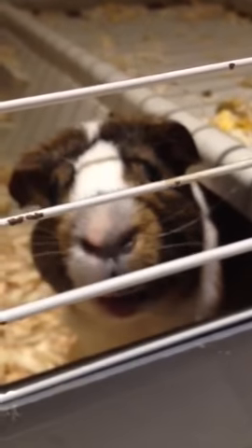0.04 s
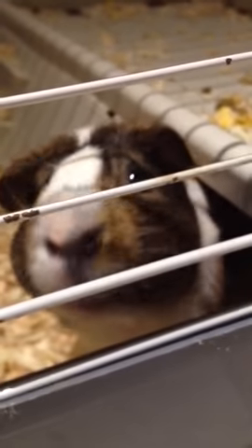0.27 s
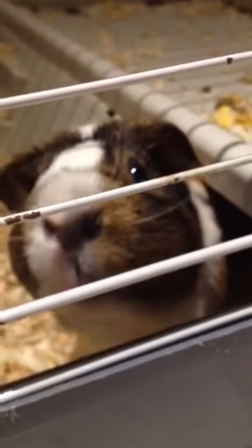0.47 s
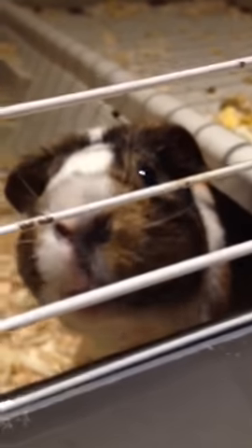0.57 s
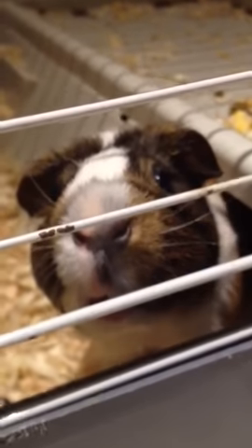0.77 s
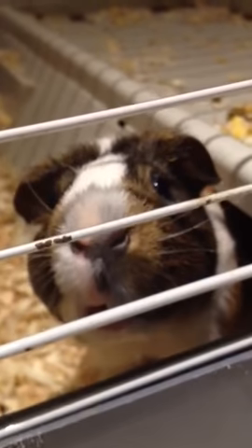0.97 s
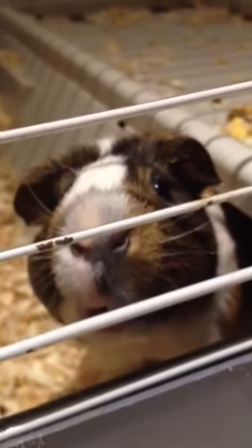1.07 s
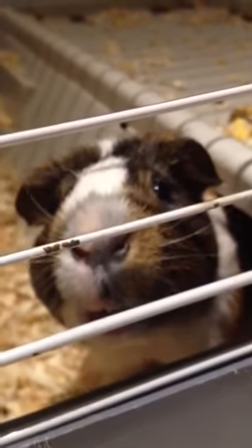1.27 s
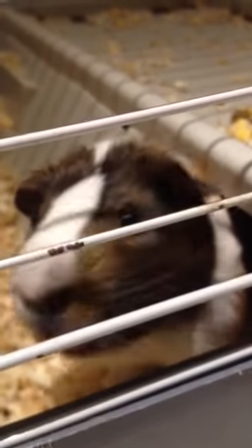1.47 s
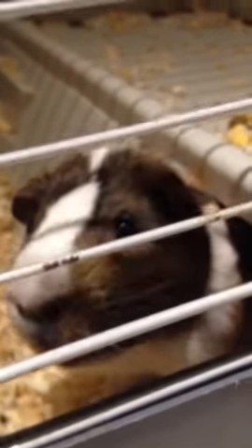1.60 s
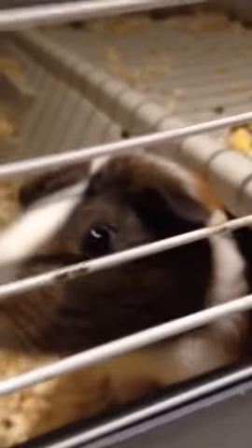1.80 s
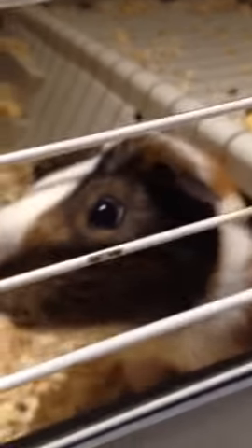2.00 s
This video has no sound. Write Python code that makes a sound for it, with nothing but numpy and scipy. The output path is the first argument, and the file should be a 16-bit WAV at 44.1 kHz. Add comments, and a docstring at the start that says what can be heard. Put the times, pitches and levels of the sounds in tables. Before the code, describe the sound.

A guinea pig close to the microphone gives two short, bright chirps that fall in pitch. It then shifts in its cage, softly rustling wood shavings and bumping the plastic tray, in a small, quiet room.

```python
"""A guinea pig close by gives two short, falling chirps: nearly pure whistles with harmonics and a rasp.
As it shifts about its cage, wood shavings rustle in tiny snaps and friction, the wires resonate with
them, and its paws bump the plastic tray and excite its modes. The small room reverberates briefly;
behind it all lie a faint hiss and a motor hum in which two close tones beat."""
import sys
import numpy as np
from scipy import signal
from scipy.fft import rfft, irfft, next_fast_len
from scipy.io import wavfile

SR = 44100
rng = np.random.default_rng(int(sys.argv[2]) if len(sys.argv) > 2 else 0)


def persist_wave(psi):
    """Save psi, clipped to +-1, as 16-bit WAV."""
    counts = np.round(np.clip(psi, -1, 1) * 32767).astype(np.int16)
    wavfile.write(sys.argv[1], SR, np.atleast_2d(counts).T)


N = 90404
T = np.arange(N) / SR


def from_db(db):
    """Amplitude ratio of a level: a factor of ten per 20 dB."""
    return 10 ** (np.asarray(db) / 20)


def unit_rms(x):
    """Normalisation to unit mean power."""
    return x / np.sqrt(np.mean(x ** 2) + 1e-20)


def drift(corner_hz):
    """Smooth random fluctuation: white noise through a two-pole low-pass, at unit power."""
    pole = np.exp(-2 * np.pi * corner_hz / SR)
    return unit_rms(signal.lfilter([1], [1, -2 * pole, pole * pole], rng.standard_normal(N + SR))[SR:])


def coloured(x, spectrum, tilt_db=0):
    """Spectral shaping by (f/Hz, level/dB) points and a tilt per octave, at unit power."""
    size = next_fast_len(N + SR)
    octave = np.log2(np.fft.rfftfreq(size, 1 / SR) + 1)
    hz, db = np.transpose(spectrum)
    gain_db = np.interp(octave, np.log2(hz), db + tilt_db * np.log2(hz / hz[0]))
    octaves_outside = np.maximum(np.log2(hz[0]) - octave, 0) + np.maximum(octave - np.log2(hz[-1]), 0)
    return unit_rms(irfft(rfft(x, size) * from_db(gain_db - 12 * octaves_outside), size)[:N])


def envelope(start, rise, hold, fade, db):
    """Linear rise, hold at db, then exponential decay of 20 dB per fade; times in seconds."""
    fading_s = np.maximum(T - start - rise - hold, 0)
    return np.clip((T - start) / rise, 0, 1) * from_db(db - 20 * fading_s / fade)


def motor_hum(beat_peak_s=1.32):
    """Beating: two of the tones interfere at their difference frequency, about 10 Hz."""
    # tones of the motor: f/Hz, level/dB
    tones = [(100, -81.5), (200.5, -67.5), (210.6, -62), (1131.5, -75)]
    cycles = rng.random()
    return sum(np.sqrt(2) * from_db(db) * np.sin(2 * np.pi * (hz * (T - beat_peak_s) + cycles))
               for hz, db in tones)


def room_hiss(level_db=-64, waver_db=1):
    """Broadband noise under a slight, slow amplitude modulation."""
    # spectrum of the hiss: f/Hz, relative level/dB
    hiss_spectrum = [(25, -30), (45, -28), (65, -15.5), (90, -7.5), (170, 1.5), (300, 0.5), (600, -6),
                     (1200, -6.5), (2200, -11), (4500, -12.5), (7000, -14), (10000, -22), (15000, -19)]
    return from_db(level_db + waver_db * drift(3.7)) * coloured(rng.standard_normal(N), hiss_spectrum)


def crackle(snaps_per_s=4000, spread_db=3.5, friction_share=0.538):
    """Shot noise of tiny, uneven snaps over smooth friction; being incoherent, their powers add."""
    sizes = from_db(spread_db * np.minimum(rng.exponential(1, N), 4)) * rng.choice([-1, 1], N)
    snaps = unit_rms(sizes * (rng.random(N) < snaps_per_s / SR))
    return np.sqrt(1 - friction_share) * snaps + np.sqrt(friction_share) * rng.standard_normal(N)


def shavings_rustle():
    """Fracture and friction: each movement crushes a patch of shavings in a burst of noise."""
    # movements: t/s, rise/s, hold/s, 20 dB fade/s, level/dB, tilt/(dB per octave)
    movements = [ (0.125, 0.0106, 0.0183, 2.2, -73.5, -1.5), (0.223, 0.00304, .01, 0.1371, -58.5, 0),
                 (.31, 0.0603, .12, 0.2767, -58.5, -1.91), (0.548, 0.0105, 0.014, 0.57, -65.5, -3),
                 (0.718, 0.0225, 0.0363, 0.3743, -60.5, -1.5), (0.879, 0.0074, 0.019, 0.2143, -63.5, 6),
                 (0.925, 0.00155, 0.0326, 0.153, -57.5, -2), (1.053, 0.0062, 0.019, 0.0826, -52, 1.06),
                 (1.081, 0.0115, 0.0176, 0.1258, -47, 0.65), (1.185, 0.0308, 0.0654, 0.0365, -61.5, -1.13),
                 (1.371, 0.0052, 0.0534, 0.0046, -63, 1.5), (1.667, 0.0184, 0.0146, 0.4, -67.5, 1.1),
                 (1.813, 0.0407, 0.038, 0.21, -64.5, -0.4)]
    # spectrum of the shavings: f/Hz, relative level/dB
    wood_spectrum = [(200, -3.5), (600, 1), (1200, -2.5), (2200, 0), (3200, -1), (4400, 1.5), (5600, -3.5),
                     (6400, -1.5), (9000, -2), (12500, -11.5), (15500, -16.5)]
    return sum(envelope(*shape) * coloured(crackle(), wood_spectrum, tilt) for *shape, tilt in movements)


def cage_wires(rustle, bandwidth_hz=44.8):
    """Sympathetic resonance: the rustle drives the wires in narrow bands about their modes."""
    # modes of the wires: f/Hz, peak gain/dB
    wire_modes = [(1480, 1.5), (2055, -3), (3290, 0.5), (3420, -5), (4330, 0.5), (5080, 4.5), (6250, 4.5),
                  (7000, 1.5), (11550, 2)]
    return sum(from_db(db) * signal.lfilter(*signal.iirpeak(hz, hz / bandwidth_hz, fs=SR), rustle)
               for hz, db in wire_modes)


def reverberation(x, low_t60_s=0.607, treble_t60_s=0.18, split_hz=8200, build_s=0.004):
    """The room's diffuse field decays exponentially in two bands; the fainter treble dies sooner."""
    # colour and level of the room's reverberant tail: f/Hz, level/dB
    tail_spectrum = [(200, -20), (900, -15), (1700, -15.5), (2050, -16), (2400, -20), (3300, -15),
                     (4200, -16.5), (4750, -12.5), (6000, -13), (9000, -19.5), (15000, -32.5)]
    hz, db = np.transpose(tail_spectrum)
    gain = from_db(np.interp(np.log(np.fft.rfftfreq(N, 1 / SR) + 1), np.log(hz), db))
    response = 0
    for side, t60 in (("low", low_t60_s), ("high", treble_t60_s)):
        noise = irfft(rfft(rng.standard_normal(N)) * gain, N)
        noise = signal.sosfilt(signal.butter(4, split_hz, side, fs=SR, output="sos"), noise)
        decay = from_db(-60 * T / t60) * (1 - np.exp(-T / build_s))
        response = response + noise * decay / np.linalg.norm(decay)
    return signal.fftconvolve(x, response)[:N]


def chirps(waver_hz=212, shimmer_db=0.5, rasp_follow=0.31, edge_s=0.0033):
    """A harmonic series on a falling pitch; overtones flare early, and noise pulses once per period."""
    # contour of each chirp: t/s, f/Hz, level/dB of harmonics 1, 2, 3 and 4
    contours = [
        [(.237, 2526, -58, -78, -81, -85), (.2415, 2412, -35, -61, -52.5, -78),
         (.2445, 2360, -26.5, -30, -51.5, -57), (.2495, 2215, -22, -33, -47, -53.5),
         (.2545, 2072, -25.5, -50, -51.5, -61), (.267, 2048, -27.5, -57, -55.5, -64.5),
         (.281, 1944, -34.5, -59.5, -58, -78), (.290, 1771, -36, -66, -69.5, -87),
         (.293, 1610, -50.5, -68, -86, -89)],
        [(.437, 2680, -45, -70.5, -64, -85), (.441, 2557, -34, -46, -57, -77.5),
         (.4465, 2359, -24.5, -36.5, -44, -69), (.4510, 2184, -21.5, -32, -41.5, -70.5),
         (.4545, 1952, -31.5, -41, -54.5, -51.5), (.461, 1766, -30.5, -42, -59.5, -56.5),
         (.478, 1621, -38, -41, -70, -62.5), (.487, 1504, -39, -51.5, -74.5, -73.5),
         (.491, 1304, -52, -66.5, -76.5, -79)],
    ]
    # voice of each chirp: fall per harmonic above the fourth/dB, relative pitch jitter, rasp level/dB
    voices = [(8, 0.00307, -69.5), (15, 0.0067, -45.5)]
    # spectrum of the rasp: f/Hz, relative level/dB
    rasp_spectrum = [(1200, -8.5), (2800, -2.5), (3600, -0.5), (4700, 5), (5700, -2.5), (7200, -6.5),
                     (8300, -6), (9500, -25), (12500, -12), (15000, -23)]
    out = 0
    for contour, (fall_db, jitter, rasp_db) in zip(contours, voices):
        times, *columns = np.transpose(contour)
        hz, *levels = [np.interp(T, times, column) for column in columns]
        levels += [levels[-1] - fall_db * step for step in (1, 2, 3)]  # harmonics 5 to 7
        phase = 2 * np.pi * np.cumsum(hz * (1 + jitter * drift(waver_hz))) / SR
        whistle = np.sqrt(2) * sum(from_db(db) * np.sin(k * phase) for k, db in enumerate(levels, 1))
        rasp = coloured(rng.standard_normal(N) * (1 + np.cos(phase)), rasp_spectrum)
        rasp *= from_db(rasp_db + rasp_follow * (levels[0] - levels[0].max()))
        gate = np.clip(np.minimum(T - times[0], times[-1] - T) / edge_s + 1, 0, 1)
        out += gate * (whistle + rasp) * from_db(shimmer_db * drift(waver_hz))
    return out


def tray_bumps():
    """Forced vibration: paws and body scuff the plastic floor, which colours the noise dull."""
    # contacts: t/s, rise/s, hold/s, 20 dB fade/s, level/dB, tilt/(dB per octave)
    contacts = [ (0.299, 0.041, .14, 0.81, -74, 4.5), (0.545, 0.0058, 0.035, 0.84, -59.5, 2.5),
                (0.732, 0.0173, 0.0354, 0.42, -61.5, 2), (0.88, 0.011, 0.0196, 0.0157, -59.5, -2),
                (.930, 0.0022, 0.012, 0.25, -57, 2.5), (1.082, 0.007, .03, 0.4942, -60, 0.5),
                (1.435, 0.044, 0.011, 0.09, -65.5, 2), (1.725, 0.0214, .01, 0.85, -67, -0.5),
                (1.82, .09, .035, .05, -63.5, 2.5), ]
    # spectrum of the tray: f/Hz, relative level/dB
    tray_spectrum = [(120, -22.5), (220, 0), (300, -4), (450, -3), (720, -0.5), (1100, -7), (1800, -13),
                     (4000, -20)]
    return sum(envelope(*shape) * coloured(crackle(), tray_spectrum, tilt) for *shape, tilt in contacts)


def paw_knocks(low_cut_hz=261):
    """Free vibration: a paw lands and the tray's damped modes give a short, hollow ring."""
    # impacts: t/s, level/dB
    impacts = [(.9315, -44), (.9425, -53)]
    # modes of the tray: f/Hz, relative level/dB, T60/s
    tray_modes = [(302.4, -6, 0.059), (397.5, -2, 0.0546), (526.6, -5, 0.06), (693, -4, 0.05),
                  (875, -7, 0.046), (1480, -16, 0.026), (2500, -7.5, 0.0264)]
    out = 0
    for start, db in impacts:
        age = np.maximum(T - start, 0)
        for k, (hz, mode_db, t60) in enumerate(tray_modes):
            amplitude = from_db(db + mode_db + rng.normal(0, 1) - 60 * age / t60)
            out += (-1) ** k * amplitude * np.sin(2 * np.pi * hz * age)
    return signal.sosfilt(signal.butter(2, low_cut_hz, "high", fs=SR, output="sos"), out)


def weight_shift(band_hz=(112.4, 208)):
    """Band-limited noise: one low rumble as the animal shifts its weight on the tray."""
    rumble = signal.sosfilt(signal.butter(2, band_hz, "band", fs=SR, output="sos"), rng.standard_normal(N))
    return envelope(start=1.08, rise=0.04, hold=0.06, fade=0.12, db=-66.5) * unit_rms(rumble)


def scene():
    """Superposition of the direct sound from the cage, its reverberation and the background."""
    calls = chirps()
    rustle = shavings_rustle()
    cage = calls + rustle + cage_wires(rustle) + tray_bumps() + weight_shift() + paw_knocks()
    return (cage + reverberation(cage) + motor_hum() + room_hiss())[None]


def record(dry, cutoff_hz=15450):
    """Band limiting: an elliptic low-pass cuts the top steeply."""
    return signal.sosfilt(signal.ellip(12, .1, 70, cutoff_hz, fs=SR, output="sos"), dry)


dry = scene()
out = record(dry)
persist_wave(out)
```